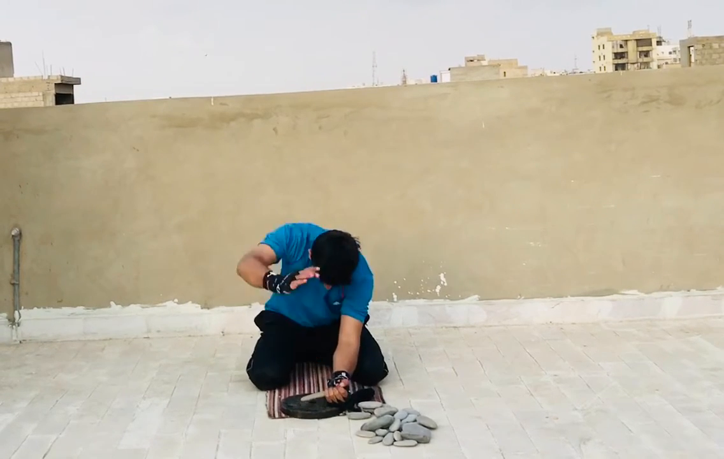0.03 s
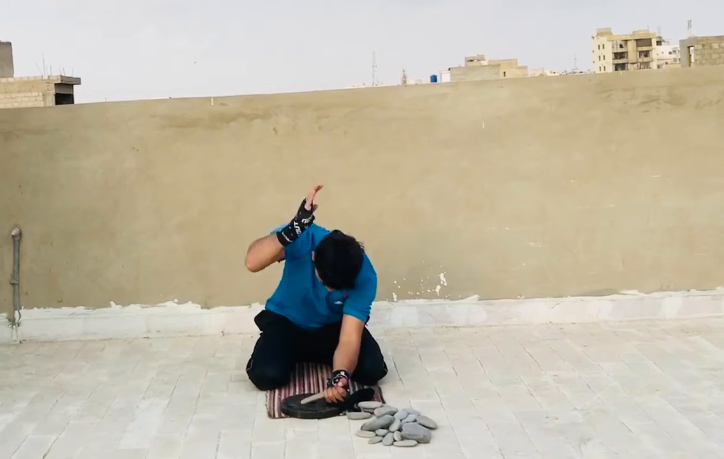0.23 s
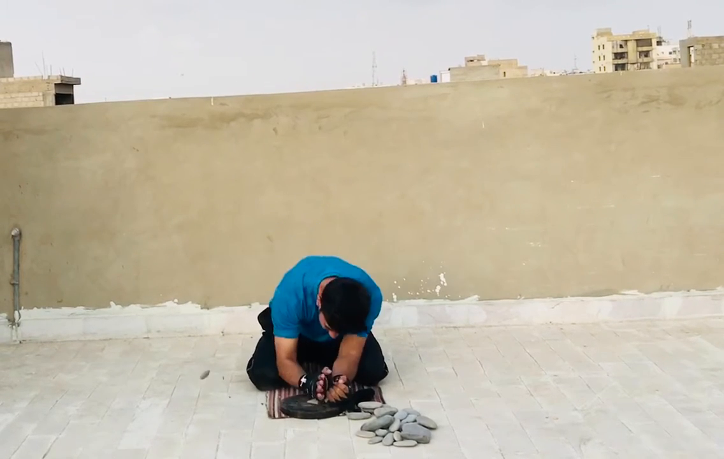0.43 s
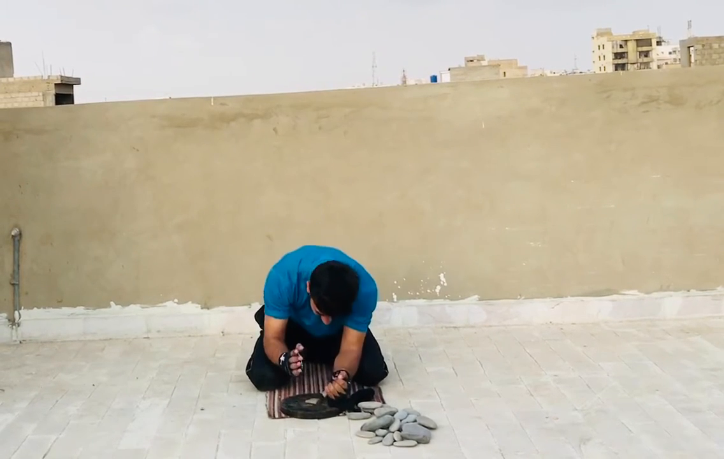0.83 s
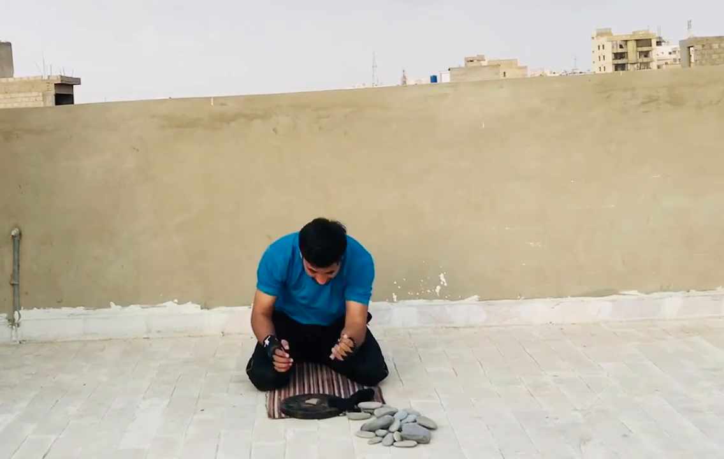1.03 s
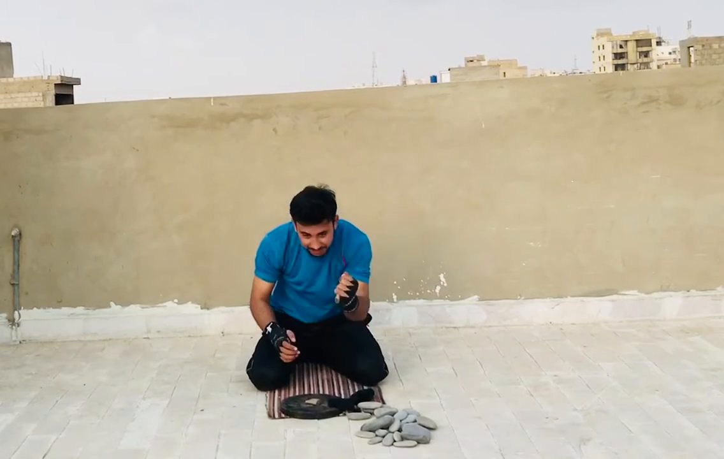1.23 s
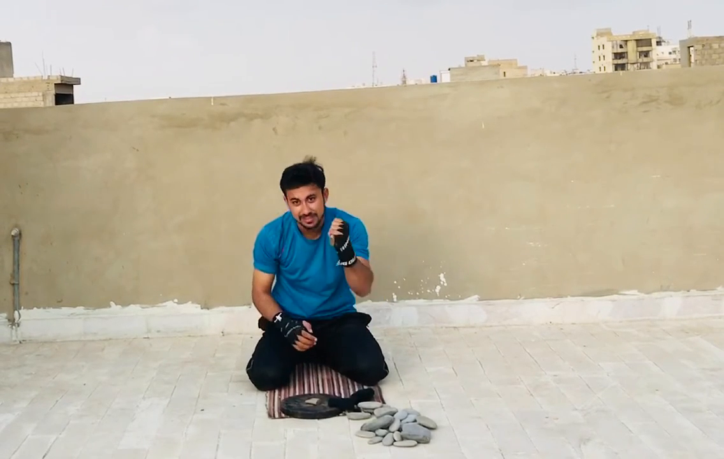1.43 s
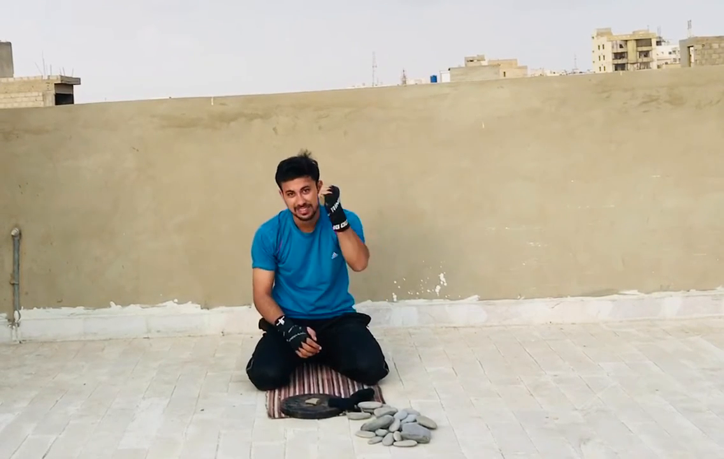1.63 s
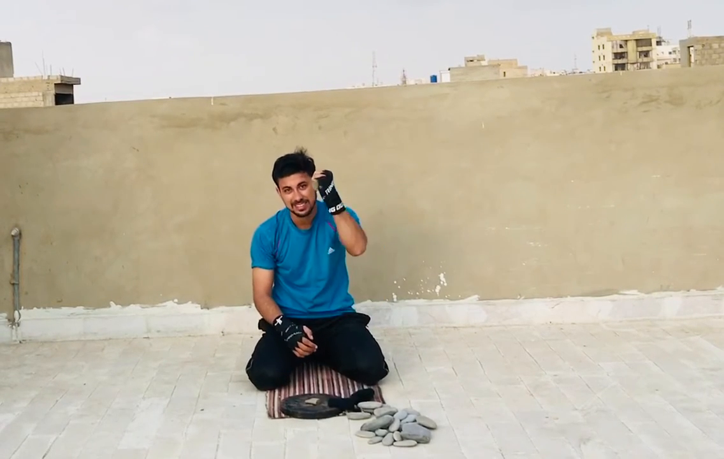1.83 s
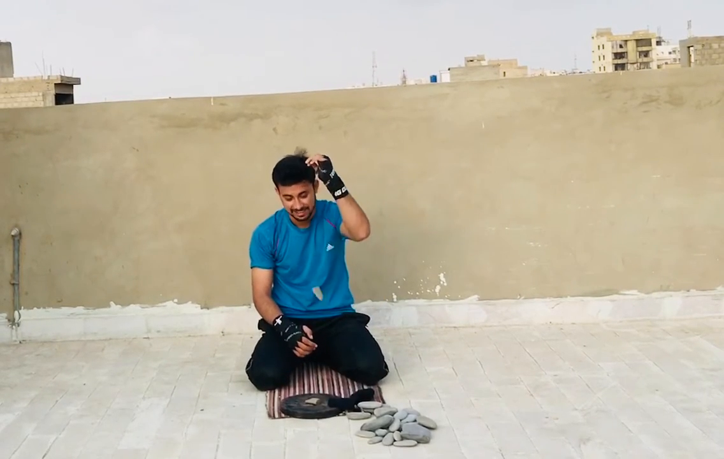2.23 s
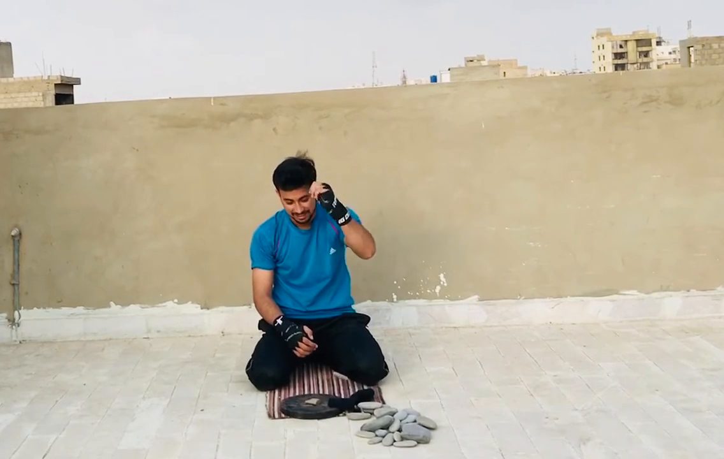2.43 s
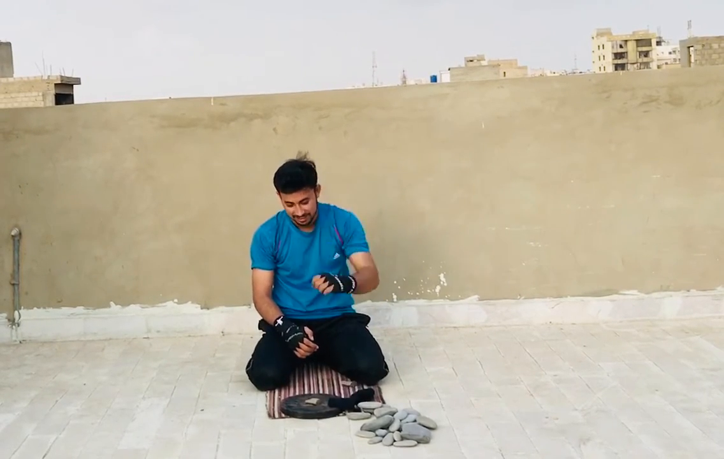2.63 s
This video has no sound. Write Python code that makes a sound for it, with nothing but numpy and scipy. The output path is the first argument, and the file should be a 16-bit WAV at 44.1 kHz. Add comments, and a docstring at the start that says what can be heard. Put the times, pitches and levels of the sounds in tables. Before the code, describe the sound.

A stone cracks apart under a hand against a metal base, and chips skitter over tiles. Later a piece clinks on the metal. Wind buffets the microphone on a walled roof terrace, with faint birds and town hum.

```python
"""On a walled roof terrace, wind buffets the microphone over a faint town hum.
A hand smashes a stone against a metal base: a burst of cracks, a dull thud, a short choked ring.
The wall throws back a slap echo while chips and grit skitter over the tiles.
Later, faint birds whistle far off and a piece of stone clinks on the metal, letting it ring."""
import sys
import numpy as np
from scipy import signal
from scipy.fft import rfft, irfft, next_fast_len
from scipy.io import wavfile
from scipy.ndimage import uniform_filter1d

SR = 44100
rng = np.random.default_rng(int(sys.argv[2]) if len(sys.argv) > 2 else 0)


def store_wav(level_fs):
    """Save 16-bit WAV to argv[1]."""
    pcm = np.round(np.clip(np.atleast_2d(level_fs), -1, 1) * 32767)
    wavfile.write(sys.argv[1], SR, pcm.T.astype(np.int16))


N = 119070
T = np.arange(N) / SR
SMASH_S, TOP_HZ = 0.4, 16000


def undb(db):
    """Decibels to gain."""
    return 10 ** (np.asarray(db) / 20)


def at_hz(points, hz):
    """Read a table on a log-frequency axis."""
    freqs, values = np.array(points, float).T
    return np.interp(np.log(hz + 1), np.log(freqs), values)


def fade(t60, size=N):
    """Exponential decay, 60 dB down after t60 seconds."""
    return np.exp(-np.log(1000) * T[:size] / max(t60, 1e-4))


def blow(x, db):
    """Scale a hit to the energy of one millisecond at this level."""
    return x * undb(db) / np.sqrt(np.sum(x ** 2) * 1000 / SR)


def shape(x, db_of):
    """Minimum-phase EQ whose gain in dB is a function of frequency."""
    size = next_fast_len(2 * len(x), True) // 2 * 2
    cepstrum = irfft(np.log(undb(db_of(np.fft.rfftfreq(size, 1 / SR)))))
    cepstrum[1:size // 2] *= 2
    cepstrum[size // 2 + 1:] = 0
    return irfft(rfft(x, size) * np.exp(rfft(cepstrum)))[:len(x)]


def colour(x, points):
    """EQ by a table of f/Hz, level/dB."""
    return shape(x, lambda hz: at_hz(points, hz))


def burst(t60, size=4096):
    """Dying noise of one contact."""
    return rng.standard_normal(size) * fade(t60, size)


def ring(modes, size):
    """Struck modes (f/Hz, level/dB, t60/s); neighbours swing in opposite directions."""
    return sum((-1) ** k * undb(db) * fade(t60, size) * np.cos(2 * np.pi * hz * T[:size])
               for k, (hz, db, t60) in enumerate(modes))


def add(out, s, x):
    """Mix a sound in at s seconds."""
    start = int(s * SR)
    out[start:start + len(x)] += x[:max(N - start, 0)]


def town():
    """A steady bed of distant hum."""
    # spectrum of the hum: f/Hz, relative level/dB
    hum_eq = [(20, -14.5), (60, 1.5), (600, -8.5), (2500, -20), (4200, -22), (6500, -30), (8500, -37),
              (11000, -43), (11600, -28), (12200, -39), (15500, -37)]
    hum = colour(rng.standard_normal(N), hum_eq)
    return hum / hum.std() * undb(-51.5)


def wind():
    """Gusty rumble on the microphone, with a few sudden bumps of pressure."""
    # spectrum of the rumble: f/Hz, relative level/dB
    rumble_eq = [(20, -27), (55, 6), (100, -4), (230, -19), (700, -68), (3000, -96)]
    # gust envelope: t/s, level/dB
    gusts = [(0, -49.5), (.125, -37.5), (.145, -28), (.2, -29.5), (.31, -50.5), (.9, -43), (.945, -34),
             (.99, -52.5), (1.39, -56), (1.425, -29.5), (1.49, -29.5), (1.6, -48.5), (2.04, -53.5),
             (2.12, -33), (2.22, -32.5), (2.26, -31), (2.33, -42), (2.53, -47.5), (2.58, -42), (2.7, -48)]
    # sharp buffets: t/s, level/dB, upper edge/Hz
    buffets = [(.15, -20, 242), (0.182, -8, 105), (2.167, -10.5, 216)]
    rumble = colour(rng.standard_normal(N), rumble_eq)
    rumble /= np.sqrt(uniform_filter1d(rumble ** 2, size=2400))  # level it, so the gusts set the swell
    out = rumble * undb(np.interp(T, *np.array(gusts).T))
    low_cut = signal.butter(3, 67.5, "high", fs=SR, output="sos")
    for s, db, hz in buffets:
        high_cut = signal.butter(4, hz, fs=SR, output="sos")
        bump = signal.sosfilt(np.vstack([high_cut, low_cut]), signal.unit_impulse(8192))
        add(out, s - .003, blow(bump, db))
    return out


def breaking_stone():
    """Each crack snaps and rings the stone; the hand thuds through to the ground."""
    # cracks: t/s, level/dB, snap offset/dB
    cracks = [(0.395, -26, -1.5), (0.3986, -6, 2.5), (0.4016, -19.5, 3.5), (0.4038, -10.5, 2),
              (.407, -6, -0.5), (0.4103, -6, -5.5), (.4131, -10, -0.5), (0.4141, -9.5, -7), (0.429, -16, 1)]
    # broad resonances of the stone: f/Hz, relative level/dB
    stone_modes = [(1040, -11.5), (1250, -6.5), (1450, -4.5), (1650, -6.5), (2170, -5), (2370, -4),
                   (2520, -1), (3390, 2), (3610, -0.5), (4000, -5.5)]
    # spectrum of the fracture: f/Hz, relative level/dB
    snap_eq = [(700, -4.5), (2500, 3.5), (4700, -5), (5600, 2.5), (7300, -2.5), (9000, 4), (10600, -6.5),
               (12000, -4.5), (16000, -16)]
    # spectrum of the thud: f/Hz, relative level/dB
    thud_eq = [(40, -34.5), (90, -13), (150, 1.5), (250, -6.5), (400, -18), (1400, -53)]
    detune = 0.037  # each crack leaves a piece of slightly different size
    out = np.zeros(N)
    for s, db, snap_db in cracks:
        modes = [(hz * (1 + detune * rng.uniform(-1, 1)), mode_db, 0.06) for hz, mode_db in stone_modes]
        treble_db = 11.5 * np.exp(-abs(s - SMASH_S) / 0.00492)  # brightest at the moment of the smash
        snap = colour(burst(t60=0.016), snap_eq)
        snap = colour(snap, [(10000, 0), (TOP_HZ, treble_db)])
        add(out, s, blow(ring(modes, size=4096), db - 1.5) + blow(snap, db + snap_db))
    thud = colour(burst(t60=0.33, size=32768), thud_eq)
    attack = 1 - np.exp(-T[:len(thud)] / 0.01173)
    add(out, SMASH_S, blow(thud * attack, db=-8.5))
    return out


def metal_base():
    """Stone ticks on the metal and sets its modes beating; pressed down, it mutes most of them."""
    # modes of the base: f/Hz, relative level/dB, t60/s
    modes = [(1326, 0, .32), (2030, -5, .25), (2967, -3, .17), (3001, -2, .21), (3461, -10, .36),
             (5222, -15, .34), (5572, -14, .16), (6736, -15, .22), (7844, -14, .29), (8699, -19, .24),
             (9455, -18, .22), (10756, -15, .25), (13890, -21, .15)]
    # hits on the metal: t/s, ring level/dB, tick level/dB, muting/dB
    clinks = [(.41, -10.5, -23, -19), (2.3721, -3, -13.5, -1)]
    # spectrum of the contact tick: f/Hz, relative level/dB
    tick_eq = [(300, -2.5), (1900, 1), (9000, -8.5), (14000, -16), (16000, -29)]
    unmuted = (1, 4)  # modes with a node under the stone ring on
    beat_depth, max_beat_hz, size = .5, 44, 32768
    out = np.zeros(N)
    for s, ring_db, tick_db, mute_db in clinks:
        tone = np.zeros(size)
        for k, (hz, db, t60) in enumerate(modes):
            beating = 1 + beat_depth * np.cos(2 * np.pi * rng.uniform(0, max_beat_hz) * T[:size])
            tone += beating * ring([(hz, db + mute_db * (k not in unmuted), t60)], size)
        add(out, s, blow(tone, ring_db))
        add(out, s, blow(colour(burst(t60=0.055), tick_eq), tick_db))
    return out


def stone_click(db, centre_hz, t60):
    """A click with a broad resonance, steeper on top, over a dull skirt; smaller chips sound higher."""
    def resonance_db(hz):
        width_octaves = np.where(hz < centre_hz, 0.93, .55)
        hump = np.exp(-.5 * (np.log2((hz + 1) / centre_hz) / width_octaves) ** 2)
        skirt = undb(-19.5) / (1 + (hz / centre_hz) ** 2) ** 2
        return 20 * np.log10(skirt + hump)
    return blow(shape(burst(t60), resonance_db), db)


def debris_and_slaps():
    """Chips bounce on the tiles, bright slaps come off the wall, larger pieces knock, grit thins out."""
    # chips landing and sliding, plus bright slaps off the wall after the smash and the loudest bounce:
    # t/s, level/dB, centre/Hz, t60/s
    clicks = [(0.4386, -10, 7400, 0.034), (0.4437, -16, 7100, 0.0014), (0.4429, -9, 6600, 0.0033),
              (0.686, -21, 5630, 0.0037), (0.6912, -11.5, 10100, 0.0058), (0.6931, -14, 8800, 0.0051),
              (.696, -18, 7580, 0.024), (0.7304, -17, 11400, 0.015), (.857, -25, 8100, 0.0063),
              (0.861, -23.5, 5800, 0.057), (0.8737, -24.5, 7800, 0.11), (0.9824, -27.5, 2320, 0.022),
              (0.981, -30.5, 10300, 0.099), (.99, -31, 1580, 0.028), (1.0659, -27.5, 6240, 0.014),
              (1.073, -28, 5550, 0.046), (1.0863, -27, 6270, 0.16), (1.202, -29, 4600, 0.087),
              (1.2417, -36.5, 6200, 0.023)]
    # dull knocks of the larger pieces: t/s, level/dB
    knocks = [(.689, -27), (.86, -28), (.984, -30), (1.2, -27)]
    # spectrum of a knock: f/Hz, relative level/dB
    knock_eq = [(100, 2), (450, 5), (850, -0.5), (1500, -7.5), (4000, -24)]
    out = np.zeros(N)
    for s, db, hz, t60 in clicks:
        add(out, s, stone_click(db, hz, t60))
    for s, db in knocks:
        add(out, s, blow(colour(burst(t60=0.12), knock_eq), db))
    for lateness, softness, smallness in rng.random(size=(120, 3)):
        delay_s = lateness ** 2 * .5  # grit falls thickest just after the smash
        grain = stone_click(db=-30 - 10 * softness, centre_hz=7500 * 2 ** (smallness - .5), t60=0.02005)
        add(out, SMASH_S + delay_s, grain * np.exp(-delay_s / 0.2))
    return out


def terrace(x):
    """Add a slap off the wall, a diffuse tail, and faint returns from houses further off."""
    # tone of the reverb: f/Hz, relative level/dB
    tail_eq = [(100, -2), (1500, 2), (15000, -1.5)]
    # reverb decay by band: f/Hz, t60/s
    decays = [(150, 0.69), (1500, 0.39), (8000, 0.35), (15000, 0.28)]
    wall_s, wall_db, house_s, house_db = .0392, -13.5, 0.28, -36.5
    tail_db, far_db, size = -9.5, -24.5, 32768
    hz = np.fft.rfftfreq(size, 1 / SR)
    spectrum = rfft(colour(rng.standard_normal(size), tail_eq))
    tail = np.zeros(size)
    for centre_hz, t60 in decays:
        band = at_hz([(f, f == centre_hz) for f, _ in decays], hz)  # crossfades into its neighbours
        tail += irfft(spectrum * band) * fade(t60, size)
    tail *= 1 - np.exp(-T[:size] / 0.0024)
    far = colour(burst(t60=1.67, size=size), [(6000, -1.0), (15000, -7.5)])
    far *= 1 - np.exp(-T[:size] / 0.011)
    response = undb(tail_db) * tail / np.linalg.norm(tail) + undb(far_db) * far / np.linalg.norm(far)
    response[int(wall_s * SR)] += undb(wall_db)
    house = colour(burst(t60=0.081), [(3000, 0), (TOP_HZ, -20)])  # dull, smeared echo
    add(response, house_s, undb(house_db) * house / np.linalg.norm(house))
    return x + signal.fftconvolve(x, response)[:N]


def birds():
    """Thin far-off whistles that swell and fade, blurred by a fast waver in pitch."""
    # calls: peak t/s, f/Hz, relative level/dB, swell/s
    calls = [(1.81, 4150, -5, .07), (2.0, 1814, -3, .11), (2.04, 4300, -1, .05), (2.27, 5650, -3, .05)]
    base_db, waver_depth = -57, 0.0194
    out = np.zeros(N)
    for s, hz, db, swell_s in calls:
        waver = uniform_filter1d(rng.standard_normal(N), size=128)
        pitch = hz * (1 + waver_depth * waver / waver.std())
        swell = np.exp(-((T - s) / swell_s) ** 2)
        out += undb(base_db + db) * swell * np.sin(2 * np.pi * np.cumsum(pitch) / SR)
    return out


def scene():
    """Mono mix: stone, metal and birds echo on the terrace; wind and hum stay dry."""
    sounds = breaking_stone() + debris_and_slaps() + metal_base() + birds()
    return (terrace(sounds) + wind() + town())[None]


def record(dry):
    """A hard clip on the peaks, then a steep high cut."""
    high_cut = signal.ellip(10, .2, 80, TOP_HZ, fs=SR, output="sos")
    return signal.sosfilt(high_cut, np.clip(dry, -.9, .9))


dry = scene()
out = record(dry)
store_wav(out)
```